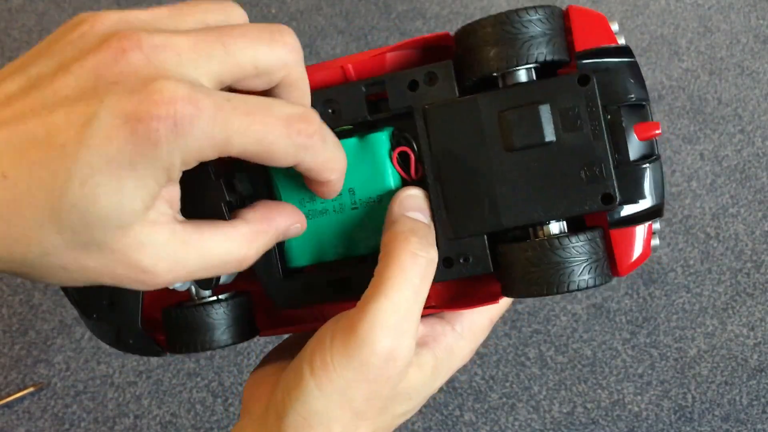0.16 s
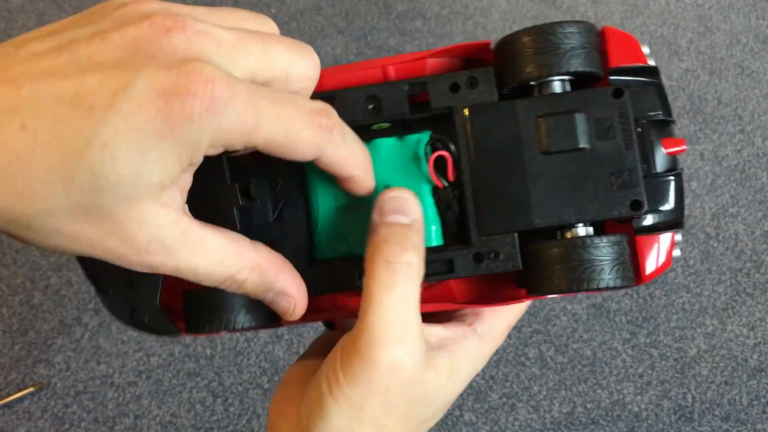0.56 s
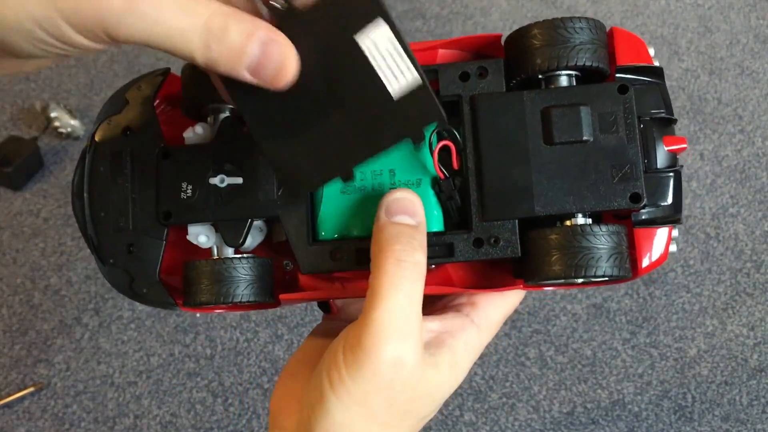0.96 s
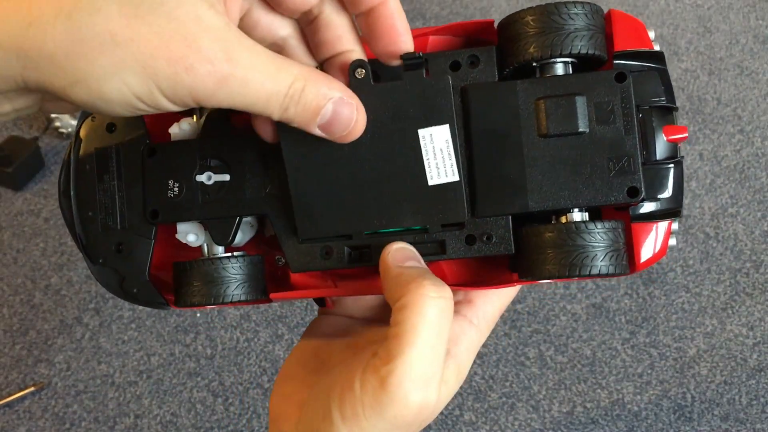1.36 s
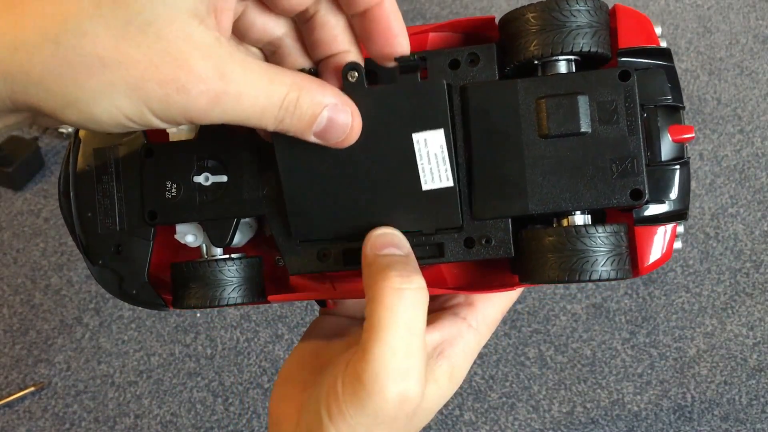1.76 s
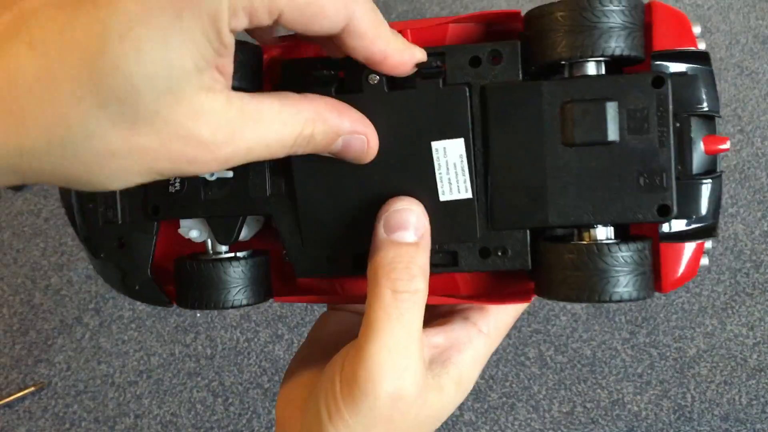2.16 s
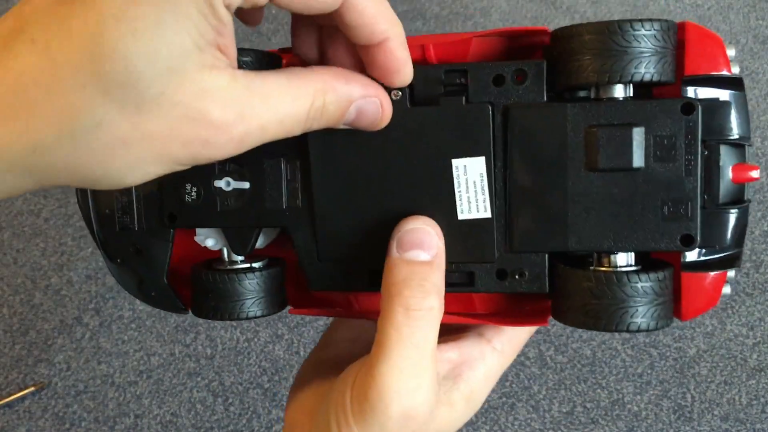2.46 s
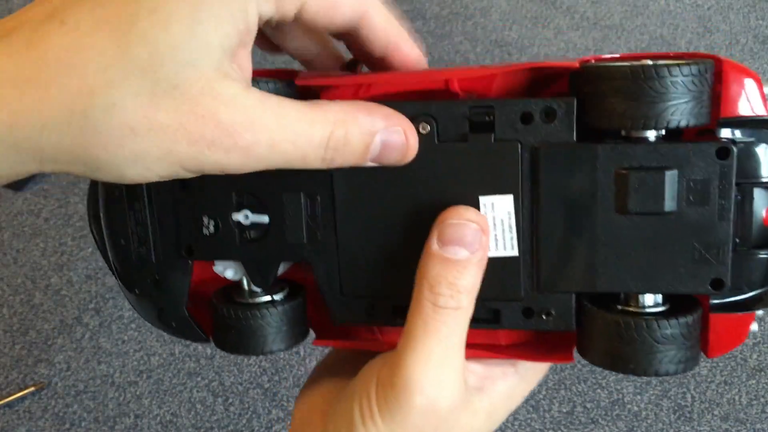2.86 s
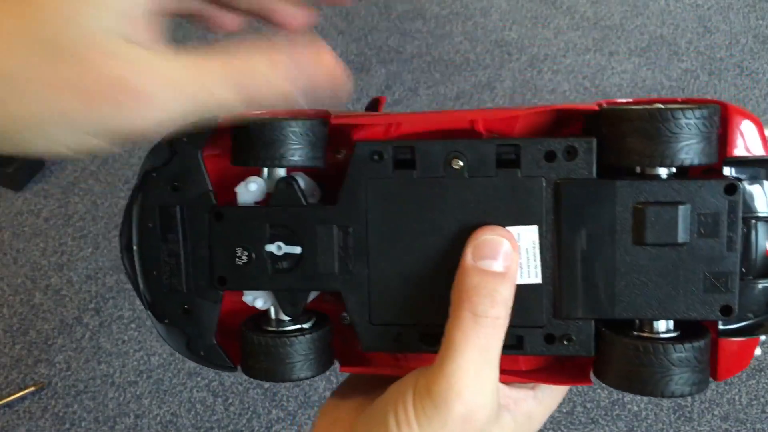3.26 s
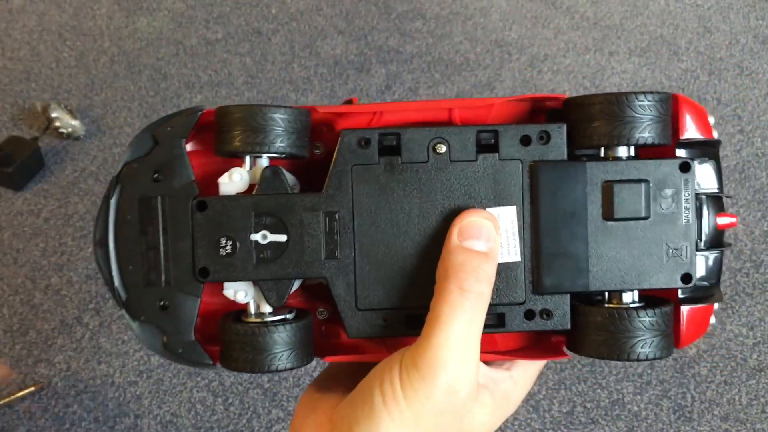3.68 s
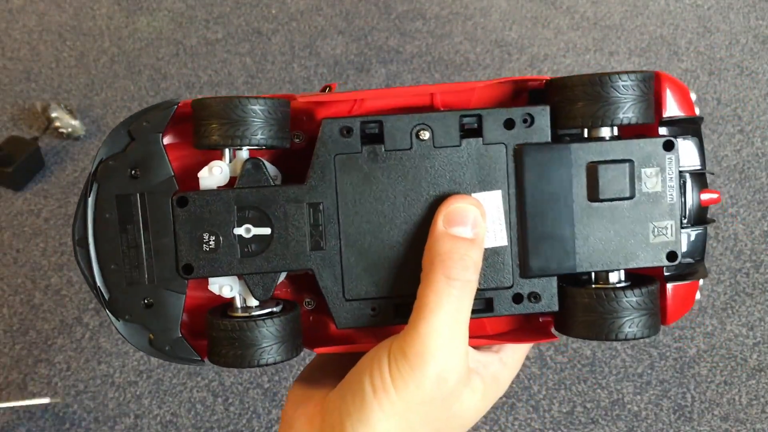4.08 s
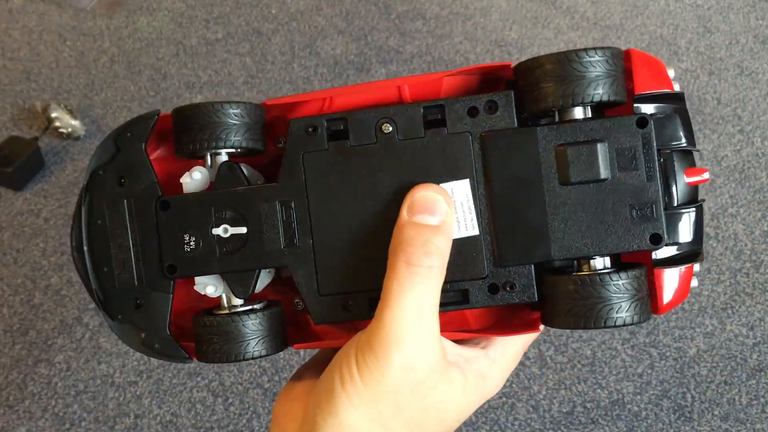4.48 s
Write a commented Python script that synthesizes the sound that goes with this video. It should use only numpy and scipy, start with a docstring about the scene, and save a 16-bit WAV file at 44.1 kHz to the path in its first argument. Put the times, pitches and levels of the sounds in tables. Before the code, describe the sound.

Fingers rub and scrape on hard plastic as a battery pack is pushed into a toy car, dropping in almost at once with a solid clack. Light clicks and rattles follow while the cover is worked into its slots. It creaks under pressure, then shuts with a sharp, bright snap, leaving a few faint handling ticks. The sounds are close, in a small carpeted room with a faint low drone.

```python
"""Battery pack into a toy car

A pack is pushed into the belly of a hand-held plastic toy car and drops in with a clack.
The cover ticks and scrapes into its slots, creaks under the thumb and snaps shut. Contacts ring
the plastic; dragged edges stick and slip. A small carpeted room answers, a faint low drone comes
from far off, and a noise gate lets hiss by at the start and after each loud blow."""
import sys
import numpy as np
from scipy import signal
from scipy.fft import rfft, irfft, next_fast_len
from scipy.io import wavfile
from scipy.ndimage import uniform_filter1d, map_coordinates

SR = 44100
rng = np.random.default_rng(int(sys.argv[2]) if len(sys.argv) > 2 else 0)


def unload_wav(signal):
    """Save mono or channel-first audio to the path in sys.argv[1] as 16-bit WAV at rate SR, clipped to [-1, 1]."""
    wavfile.write(
        sys.argv[1],
        SR,
        np.round(np.clip(np.atleast_2d(signal).T, -1, 1) * 32767).astype(np.int16),
    )


N = 204022
TOP_HZ = 16000
LEAD_SAMPLES = 512  # creep ahead of each contact
# Shell resonances. Each row: centre in Hz, width in Hz, gain in dB re the broad colour.
SHELL_MODES = [(836, 70, -2.5), (1012, 130, -5), (1420, 50, -5.5), (2105, 98, -4.5), (2520, 380, -5),
               (3150, 80, -2.5), (3560, 120, -9), (4560, 110, -6.5)]


def amp(db):
    """Gain of a level in dB."""
    return 10 ** (np.asarray(db) / 20)


def unit(x):
    """x at rms 1."""
    return x / np.sqrt(np.mean(x ** 2) + 1e-20)


def along(points, hz):
    """Interpolate (Hz, value) points on a log axis."""
    freqs, values = np.transpose(points)
    return np.interp(np.log(hz + 1), np.log(freqs + 1), values)


def add(track, start_s, sound):
    """Mix a sound into the track."""
    start = max(0, round(start_s * SR))
    track[start:start + len(sound)] += sound[:max(0, len(track) - start)]


def coloured(x, colour):
    """x filtered by (Hz, dB) points, at rms 1."""
    size = next_fast_len(N + SR // 4)
    gain = amp(along(colour, np.fft.rfftfreq(size, 1 / SR)))
    return unit(irfft(rfft(x, size) * gain, size)[:N])


def wobble(rate_hz):
    """Smooth random curve."""
    knots = rng.standard_normal(int(N * rate_hz / SR) + 4)
    return map_coordinates(knots, [np.arange(N) * rate_hz / SR])


def grains(rate_hz, spread_db):
    """Random tiny slips of uneven size, at rms 1."""
    slips = (rng.random(N) < rate_hz / SR) * rng.standard_normal(N)
    return unit(slips * amp(spread_db * rng.standard_normal(N)))


def gestures(rows, attack_s, release_s):
    """Gain of (start s, length s, dB) movements: each rises, holds and dies away."""
    t = np.arange(N) / SR
    shapes = []
    for start_s, length_s, db in rows:
        attack = np.clip((t - start_s) / attack_s, 0, 1)
        release = np.exp(-np.maximum(t - start_s - length_s, 0) / release_s)
        shapes.append(amp(db) * attack * release)
    return np.linalg.norm(shapes, axis=0)


def resonance(hz, centre_hz, width_hz):
    """Response of one damped mode, 1 at its centre."""
    return 1j * hz * width_hz / (centre_hz ** 2 - hz ** 2 + 1j * hz * width_hz)


def body(colour, modes, size=8192):
    """Spectrum of a plastic part: resonances on a broad minimum-phase colour."""
    hz = np.fft.rfftfreq(size, 1 / SR)
    cepstrum = irfft(np.log(amp(along(colour, hz))))
    cepstrum[1:size // 2] *= 2
    cepstrum[size // 2 + 1:] = 0
    ring = sum(amp(db) * resonance(hz, centre_hz, width_hz) for centre_hz, width_hz, db in modes)
    return np.exp(rfft(cepstrum)) * (1 + ring)


def driven(force, colour, modes):
    """A part rung by a force, at rms 1."""
    return unit(signal.fftconvolve(force, irfft(body(colour, modes)))[:N])


def fingers(grit=0.4, hiss_db=-14, uneven_db=0.5, firm_db=-47):
    """Skin slides over plastic: a soft rub with grit and hiss, while loose parts tick at random."""
    # Strokes on pack and shell. Each row: start in seconds, length in seconds, level in dB.
    strokes = [(-.05, 0.21, -62), (.28, 0.34, -60.5), (.66, 0.082, -67.5), (.98, 0.18, -72.5),
               (1.52, 0.04, -62), (2.0, 0.61, -73.5), (3.76, 0.056, -70), (3.88, 0.14, -71.5)]
    # Spectra of rub, hiss and loose parts. Each row: frequency in Hz, gain in dB.
    rub_colour = [(100, -28.5), (300, -2), (520, -4.5), (900, 2), (1500, 0), (2400, -6), (3500, -8),
                  (5000, -17), (8000, -29)]
    hiss_colour = [(2000, -41.5), (5000, 4), (7000, -4), (12000, 0.5), (16000, -2.5)]
    loose_colour = [(200, -29.5), (800, -5.5), (1500, -6), (2500, -1.5), (4200, 0.5), (5500, -11),
                    (16000, -14.5)]
    effort = gestures(strokes, attack_s=0.025, release_s=0.038) * amp(uneven_db * wobble(rate_hz=13))
    rub = coloured(rng.standard_normal(N) + grit * grains(rate_hz=850, spread_db=0), rub_colour)
    hiss = amp(hiss_db) * coloured(rng.standard_normal(N), hiss_colour)
    ticks = driven(grains(rate_hz=100, spread_db=1.5), loose_colour, SHELL_MODES)
    shake = (effort / amp(firm_db)) ** 0.4  # gentle strokes stir loose parts less
    return effort * (rub + hiss + ticks * shake)


def scrapes(surge_db=1.5, attack_s=0.011, release_s=0.007):
    """A dragged edge sticks and slips in surges, ringing the shell; the pressed cover flexes."""
    # Pack, then cover. Each row: start and length in seconds, edge and flex levels in dB.
    drags = [(0, 0.14, -63.5, -62.5), (0.183, .1, -50.5, -55), (0.297, 0.19, -61, -72),
             (1.121, 0.027, -68, -81), (1.321, 0.045, -62, -66.5), (2.083, 0.037, -67, -81),
             (2.116, 0.097, -52, -70), (2.307, 0.12, -65.5, -74.5), (2.609, 0.051, -48, -51.5),
             (2.682, 0.024, -42, -50.5), (2.715, 0.0117, -51, -59), (2.797, 0.01, -44, -50.5),
             (2.925, 0.077, -63, -71.5)]
    # Spectra of dragged edge and flexing cover. Each row: frequency in Hz, gain in dB.
    edge_colour = [(100, -23.5), (380, -14), (490, -16.5), (620, -15), (900, 3.5), (1500, -1), (2800, -5),
                   (4500, -17.5), (9500, -21), (16000, -17.5)]
    flex_colour = [(100, -20.5), (250, -7.5), (420, -10.5), (620, -5), (850, -13), (2500, -47.5)]
    # The cover's bending mode: centre in Hz, width in Hz, gain in dB.
    flex_modes = [(620, 63, -1.5)]
    slips = grains(rate_hz=2200, spread_db=2) * amp(surge_db * wobble(rate_hz=45))
    start_s, length_s, edge_db, flex_db = np.transpose(drags)
    edge = driven(slips, edge_colour, SHELL_MODES)
    edge *= gestures(zip(start_s, length_s, edge_db), attack_s, release_s)
    flex = driven(slips, flex_colour, flex_modes)
    flex *= gestures(zip(start_s, length_s, flex_db), attack_s, release_s)
    return edge + flex


def background(rumble_trim_db=-1, floor_db=-76):
    """Low room rumble and steady microphone noise."""
    # Rumble envelope. Each row: time in seconds, level in dB before the trim.
    rumble_levels = [(0, -53.5), (.3, -56.5), (.6, -61), (2.9, -60), (4.63, -64.5)]
    # Spectra of rumble and microphone noise. Each row: frequency in Hz, gain in dB.
    rumble_colour = [(12, -38.5), (20, -6.5), (70, -1), (90, -4), (107, -6), (124, -6.5), (145, 0.5),
                     (195, -11.5), (392, -19.5), (506, -32), (600, -24.5), (780, -51), (1320, -120)]
    floor_colour = [(100, -22.5), (300, -6), (700, -10), (1800, -14), (5000, -21), (12000, -18.5),
                    (16000, -19)]
    rumble_db = np.interp(np.arange(N) / SR, *np.transpose(rumble_levels)) + rumble_trim_db
    rumble = amp(rumble_db) * coloured(rng.standard_normal(N), rumble_colour)
    return rumble + amp(floor_db) * coloured(rng.standard_normal(N), floor_colour)


def chatter(rise_s, size=8192, creep=0.07):
    """Force spectrum of one contact: the parts creep, then a broadband stutter swells and dies."""
    age = (np.arange(size) - LEAD_SAMPLES) / SR / rise_s
    after = np.maximum(age, 0)
    swell = after * np.exp(1 - after) + creep * np.exp(-np.abs(age) / 2)
    force = rfft(swell * rng.standard_normal(size))
    whitened = irfft(force / (np.abs(force) + 1e-9))
    return rfft(whitened * np.sqrt(swell))


def spot(hz, pitch_hz, ring_db, ribs_db, wall_q=9, rib_q=11, count=13):
    """The touched wall rings at its own pitch; nearby ribs and bosses add scattered modes."""
    rib_hz = np.geomspace(700, 9000, count) * np.exp(0.1 * rng.standard_normal(count))
    weights = rng.standard_normal(count)
    ribs = sum(weight * resonance(hz, f, f / rib_q) for f, weight in zip(rib_hz, weights))
    return 1 + amp(ring_db) * resonance(hz, pitch_hz, pitch_hz / wall_q) + amp(ribs_db) * ribs


def strikes(rows, colour, modes, ring_db, ribs_db):
    """Contacts ring a part, each with its own levels of low knock, mid clack and high tick."""
    response = body(colour, modes)
    hz = np.linspace(0, SR / 2, len(response))
    over_knock, over_clack = [1 / (1 + (split_hz / (hz + 1)) ** 8) for split_hz in (1500, 5000)]
    tick_band = over_clack / (1 + (hz / TOP_HZ) ** 90)
    shares = np.array([1 - over_knock, over_knock - over_clack, tick_band])
    track = np.zeros(N)
    for start_s, rise_s, pitch_hz, *levels_db in rows:
        bands = irfft(chatter(rise_s) * response * spot(hz, pitch_hz, ring_db, ribs_db) * shares)
        bands /= np.sqrt(np.sum(bands ** 2, axis=1, keepdims=True) / (SR / 100))  # as 10 ms at rms 1
        add(track, start_s - LEAD_SAMPLES / SR, amp(levels_db) @ bands)
    return track


def shell_touches(wall_hz=1690, knock_db_per_oct=9):
    """Plastic parts touch: broad walls, pitched below wall_hz, knock more than small ribs."""
    # Each row: start and rise in seconds, spot pitch in Hz, clack in dB, tick in dB re the clack.
    touches = [(.0095, 0.0012, 2750, -55, -8.5), (.0938, 0.0021, 1522, -54.5, -2),
               (.1966, 0.0027, 890, -55, -2), (.2088, 0.008, 2540, -57, 5),
               (.3673, 0.0024, 3120, -50, -2.5), (.4065, 0.0058, 3550, -51, -4.5),
               (.4154, 0.00058, 934, -51.5, 1.5), (.5169, 0.0011, 3600, -69.5, 10),
               (0.539, 0.002, 2530, -48.5, -7), (.5437, 0.0023, 2970, -43, 2),
               (.5719, 0.00054, 1650, -56.5, 1), (.6849, 0.0032, 2270, -55.5, 0.5),
               (.8495, 0.0021, 1100, -58, -6.5), (.894, .0022, 3630, -62, 2.5),
               (.916, 0.00075, 4550, -69.5, 8), (.9906, 0.00048, 3580, -65, -8),
               (1.015, 0.0049, 4400, -70, 7.5), (1.0376, 0.0012, 3500, -67, 5.5),
               (1.0712, 0.0016, 9250, -54, 5.5), (1.0834, 0.0015, 10100, -52, 10.5),
               (1.1514, 0.0047, 2200, -63, -6), (1.2046, 0.0016, 4330, -64.5, -6),
               (1.2363, 0.0013, 2220, -67, -29), (1.26, 0.00053, 3600, -63.5, 1),
               (1.3011, 0.0013, 1334, -51.5, -1), (1.3105, 0.0015, 773, -63, 5),
               (1.4739, 0.0029, 1800, -60, -7.5), (1.5449, .005, 1210, -65, -17),
               (1.5592, 0.0014, 1520, -54.5, -9), (1.5751, 0.00063, 2680, -50.5, -10.5),
               (1.606, .002, 1750, -59, -13.5), (1.7196, 0.0019, 2520, -59, -15.5),
               (1.7455, 0.0022, 1105, -59, -14.5), (1.7558, 0.00073, 1720, -55, -1.5),
               (1.8392, 0.0026, 1170, -57.5, -15.5), (1.8562, .0006, 1200, -63.5, -6),
               (1.863, 0.0024, 960, -62.5, -10), (1.9611, 0.00067, 2300, -58.5, -6.5),
               (1.9672, 0.0014, 870, -58.5, -28), (2.0183, 0.00088, 1510, -66, -17.5),
               (2.0434, 0.0018, 1160, -61.5, -27), (2.1206, .0008, 1060, -62, 0.5),
               (2.211, 0.0035, 2080, -54, -5), (2.3567, 0.0027, 1970, -59, -2),
               (2.4726, 0.0011, 1132, -72, 1.5), (2.6115, 0.0021, 1400, -53, -4.5),
               (2.6508, 0.0014, 1560, -49, 3.5), (2.688, 0.0028, 1350, -42, -5.5),
               (2.6987, .0023, 1020, -67.5, 15.5), (2.7654, 0.00092, 1950, -45.5, -2.5),
               (2.7987, 0.0043, 910, -49.5, -4.5), (2.9583, 0.0021, 1500, -62.5, -4.5),
               (2.9808, 0.0014, 1300, -66.5, -7.5), (3.0659, 0.0023, 1500, -50, -6),
               (3.2577, 0.0017, 892, -63, -8), (3.685, 0.0013, 3286, -63, -16),
               (3.7088, .0008, 4460, -63.5, -6.5), (3.7664, 0.0012, 1970, -67, -3.5),
               (4.0057, .0012, 2500, -67, -8), (4.0956, 0.0012, 2306, -74, -15),
               (4.4611, 0.0023, 6560, -78, 6), (4.5962, 0.002, 2690, -71.5, -16)]
    # Shell spectrum. Each row: frequency in Hz, gain in dB.
    colour = [(120, -46.5), (200, -15.5), (394, -6), (491, -15.5), (683, -8), (1000, -6), (1270, -9),
              (1370, -4.5), (1480, -8), (2130, -3), (4520, -11), (4950, -19.5), (11700, -18),
              (16000, -16.5)]
    rows = []
    for start_s, rise_s, pitch_hz, clack_db, edge_db in touches:
        knock_db = clack_db + knock_db_per_oct * np.log2(wall_hz / pitch_hz)
        rows.append((start_s, rise_s, pitch_hz, knock_db, clack_db, clack_db + edge_db))
    return strikes(rows, colour, SHELL_MODES, ring_db=11.5, ribs_db=7.5)


def pack_clack():
    """The pack hits the rim, then the bottom of its bay."""
    # Each row: start and rise in seconds, spot pitch in Hz, knock, clack and tick in dB.
    hits = [(.2327, 0.00071, 15270, -35, -41, -33), (.2338, 0.0011, 3180, -25.5, -24.5, -31.5),
            (.2415, 0.0026, 2900, -47.5, -40, -41.5)]
    # Bay spectrum. Each row: frequency in Hz, gain in dB.
    colour = [(60, -15), (140, -6.5), (380, -4), (520, -18), (700, 1.5), (1000, 2), (1300, -14.5),
              (1900, 0.5), (3200, -1), (4600, -10), (6500, -8.5), (8000, -16), (12000, -13), (15300, -10.5)]
    # Bay resonances. Each row: centre in Hz, width in Hz, gain in dB.
    modes = [(145, 22, 2), (369, 25, 3.5), (770, 70, -2), (1028, 40, 1.5), (1518.5, 70, -5.5),
             (2220, 60, 0), (2470, 24, -5), (3090, 60, -0.5), (3481, 130, -7.5)]
    return strikes(hits, colour, modes, ring_db=-3, ribs_db=-4)


def bumps(rise_cycles=0.77):
    """The whole car, cushioned by the hand, swings through a few damped cycles."""
    # Thumps of hand, pack and cover. Each row: start in seconds, pitch in Hz, level in dB.
    thumps = [(0.235, 214, -43), (0.2338, 400, -42), (0.269, 38, -47.5), (0.892, 167, -46),
              (1.302, 363, -45), (2.342, 178, -47.5), (2.691, 194, -48)]
    track, t = np.zeros(N), np.arange(SR // 4) / SR
    for start_s, hz, db in thumps:
        age = t * hz / rise_cycles
        add(track, start_s, amp(db) * age * np.exp(1 - age) * np.sin(2 * np.pi * hz * t))
    return track


def far_drone(pitch_hz=77.3, waver_hz=0.49, octave_db=-19):
    """A distant low tone and its octave swell and fade."""
    # Each row: peak time in seconds, 1/e half-width in seconds, level in dB.
    swells = [(1.03, 0.15, -52.5), (1.33, 0.12, -51), (1.8, 0.22, -57.5), (4.098, 0.37, -49.5),
              (4.6, 0.11, -50)]
    t = np.arange(N) / SR
    envelope = sum(amp(db) * np.exp(-((t - peak_s) / width_s) ** 2) for peak_s, width_s, db in swells)
    phase = 2 * np.pi * np.cumsum(pitch_hz + waver_hz * wobble(rate_hz=2.9)) / SR
    return envelope * (np.sin(phase) + amp(octave_db) * np.sin(2 * phase))


def cover_snap():
    """The catch slips, snaps, and the cover lands."""
    # Each row: start and rise in seconds, spot pitch in Hz, knock, clack and tick in dB.
    hits = [(3.0748, 0.0026, 1900, -38.5, -53, -36), (3.0779, 0.00068, 12400, -34.5, -35.5, -23.5),
            (3.0805, 0.00097, 830, -30.5, -29.5, -27.5)]
    # Cover spectrum. Each row: frequency in Hz, gain in dB.
    colour = [(60, -22.5), (160, -8), (420, -15), (530, -19), (730, -4), (1100, 1), (1450, -14.5),
              (2000, -10.5), (3400, -6.5), (5000, -15), (6300, -9.5), (8500, -11.5), (12300, -6),
              (15500, -9.5)]
    # Cover resonances. Each row: centre in Hz, width in Hz, gain in dB.
    modes = [(820, 250, 6), (1006, 85, -1), (1360, 90, 1), (1639, 63, 7.5), (2000, 110, -1.5),
             (3145, 120, -4), (6400, 130, -8)]
    return strikes(hits, colour, modes, ring_db=-2, ribs_db=-2)


def room(x, delay_s=0.0046):
    """A short diffuse tail in which the treble dies first."""
    # Decay. Each row: frequency in Hz, T60 in seconds.
    t60_s = [(150, .25), (900, .31), (3000, .28), (7000, .25), (15000, 0.2)]
    # Tail strength. Each row: frequency in Hz, gain in dB.
    send_db = [(150, -8), (900, -11), (3000, -9.5), (7000, -10), (15000, -17)]
    hz, t, noise = signal.stft(rng.standard_normal(SR // 2), SR, nperseg=256)
    decay = amp(-60 * t / along(t60_s, hz)[:, None])
    energy = np.mean(decay ** 2, axis=1, keepdims=True) * SR / 2
    gain = amp(along(send_db, hz))[:, None] / np.sqrt(energy)
    tail = signal.istft(noise * decay * gain, SR, nperseg=256)[1]
    return signal.fftconvolve(x, np.pad(tail, (round(delay_s * SR), 0)))[:N]


def gate_hiss(x, open_db=-27, hold_s=0.405, hiss_db=-68):
    """A noise gate lets hiss by: it starts open, and each loud sound holds it open briefly."""
    # Hiss spectrum. Each row: frequency in Hz, gain in dB.
    colour = [(200, -7.5), (700, 5), (2000, 3), (5000, 2), (12000, -0.5), (16000, 1.5)]
    t = np.arange(N) / SR
    loud = uniform_filter1d(x ** 2, size=220) > amp(open_db) ** 2
    since_loud_s = t - np.maximum.accumulate(np.where(loud, t, 0))
    opening = uniform_filter1d(1.0 * (since_loud_s < hold_s), size=220)
    return amp(hiss_db) * opening * coloured(rng.standard_normal(N), colour)


def scene():
    """Handling, clack and snap, each with its own room tail, over the softer layers; mono."""
    parts = (shell_touches() + scrapes(), pack_clack(), cover_snap())
    plastic = sum(part + room(part) for part in parts)
    return (plastic + fingers() + bumps() + far_drone() + background())[None]


def record(dry):
    """Add the gated hiss, then low-pass steeply at TOP_HZ."""
    size = next_fast_len(N + SR // 4)
    hz = np.fft.rfftfreq(size, 1 / SR)
    spectrum = rfft(dry + gate_hiss(dry[0]), size)
    return irfft(spectrum / (1 + (hz / TOP_HZ) ** 150), size)[:, :N]


dry = scene()
out = record(dry)
unload_wav(out)
```